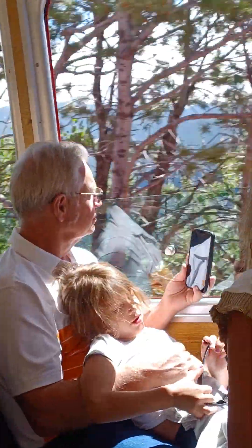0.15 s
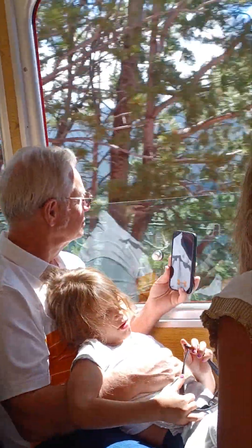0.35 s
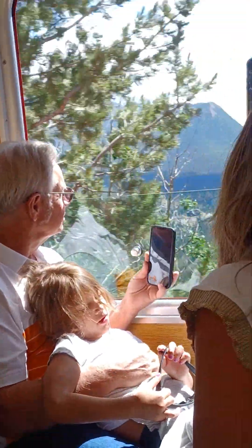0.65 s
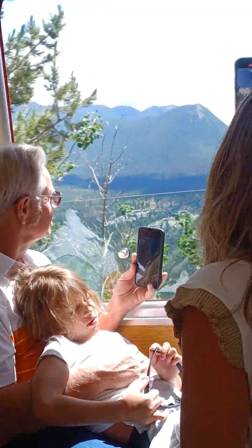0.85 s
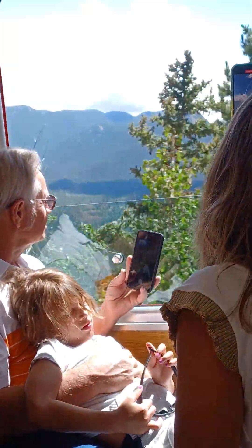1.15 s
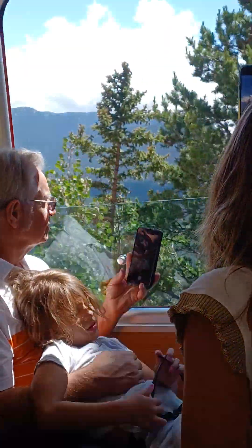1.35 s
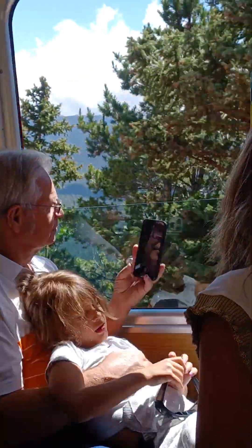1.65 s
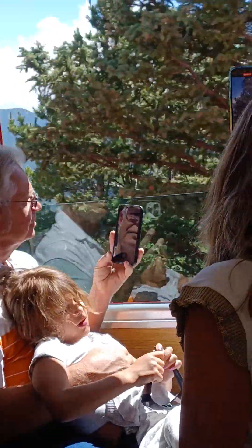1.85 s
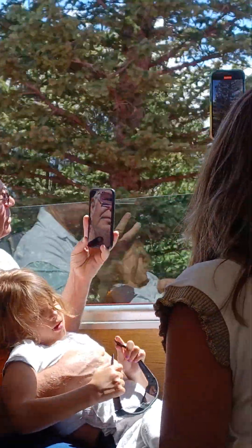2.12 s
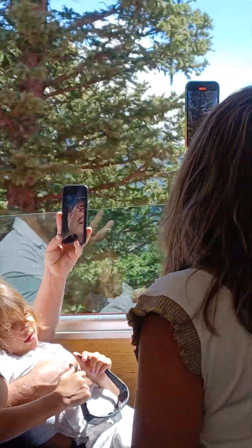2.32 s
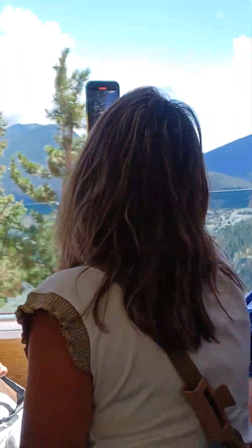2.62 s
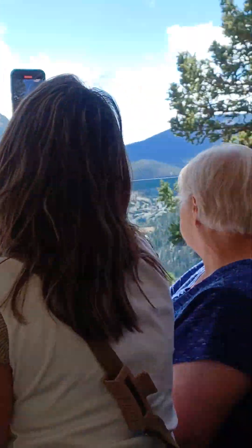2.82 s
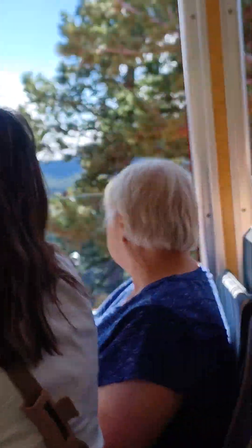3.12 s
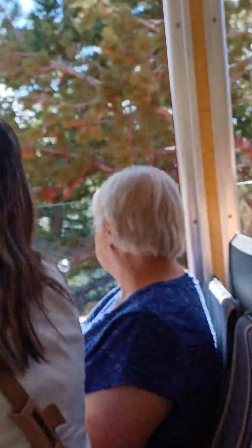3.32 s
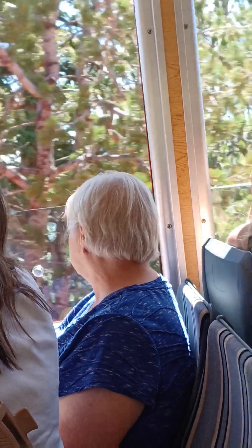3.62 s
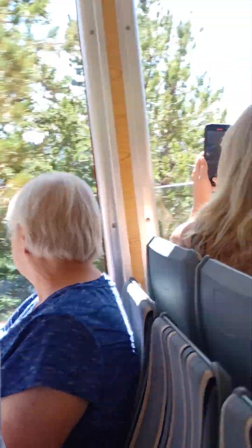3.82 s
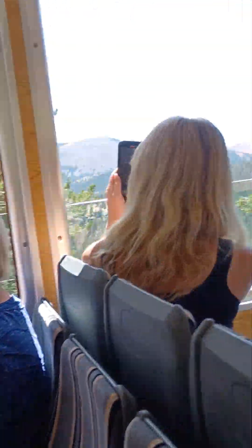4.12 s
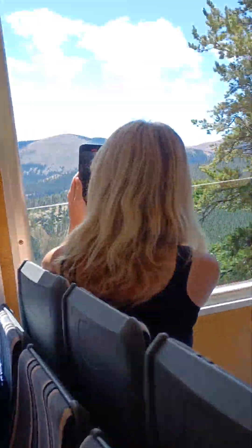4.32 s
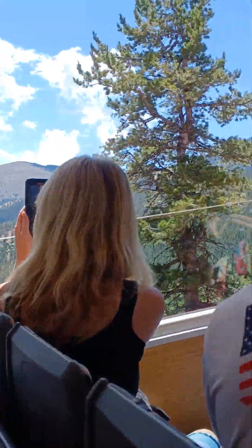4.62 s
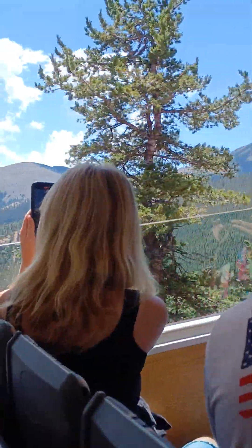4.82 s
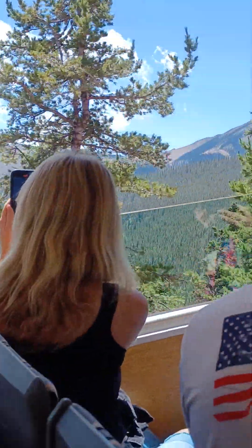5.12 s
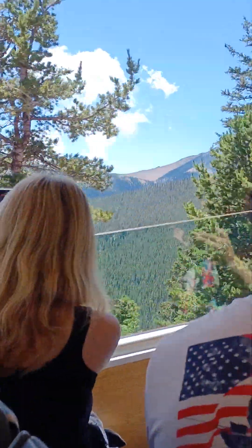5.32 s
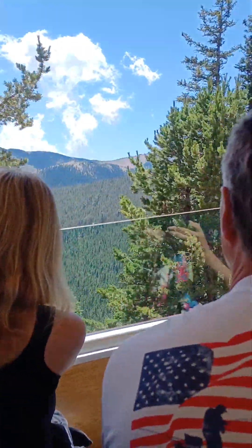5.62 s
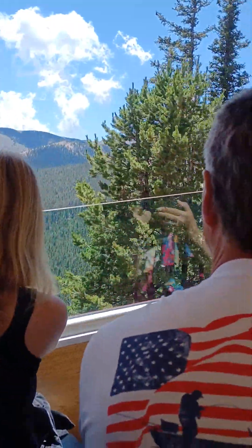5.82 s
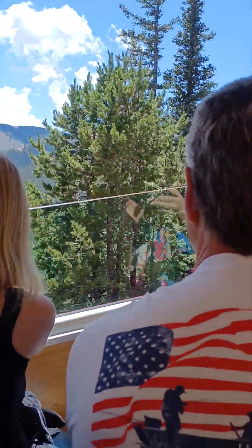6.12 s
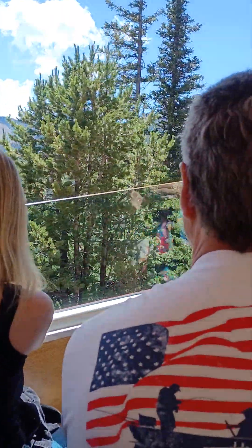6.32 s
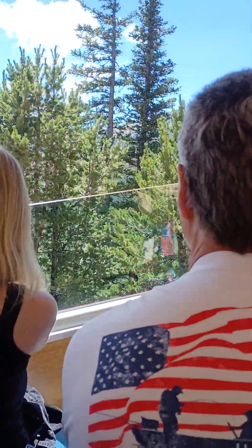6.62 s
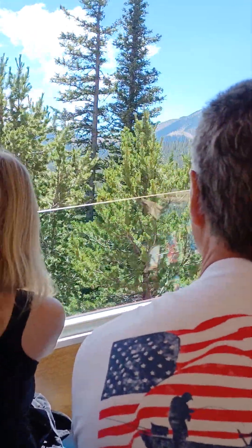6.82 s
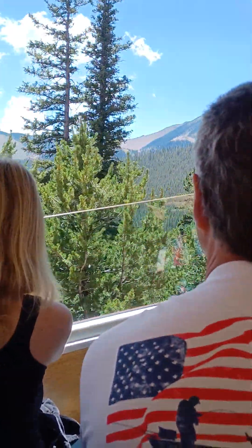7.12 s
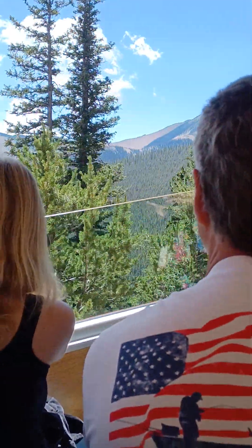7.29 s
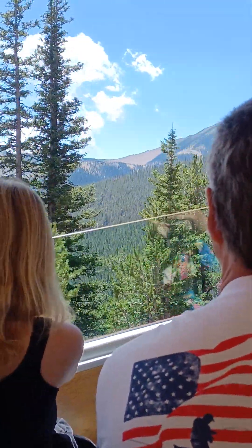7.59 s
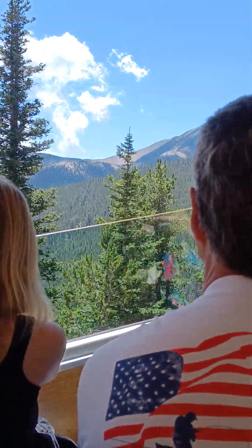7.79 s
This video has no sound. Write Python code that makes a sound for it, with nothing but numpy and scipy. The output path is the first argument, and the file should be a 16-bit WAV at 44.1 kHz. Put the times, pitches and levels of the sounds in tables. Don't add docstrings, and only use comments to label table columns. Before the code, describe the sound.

A continuous diesel drone fills a passenger cabin with open windows, beginning and ending mid-ride. Rough low rumble and layered gear hum support it; the mid hum grows clearer around the middle while the microphone swings. A thin, high whistle glints from side to side, and quiet rushing air brightens briefly as trees pass. A few faint ticks of loose fittings interrupt the otherwise steady, close stereo sound.

```python
import sys
import numpy as np
from scipy import signal
from scipy.fft import rfft, irfft, next_fast_len
from scipy.io import wavfile
from scipy.ndimage import uniform_filter1d, map_coordinates

SR = 44100
rng = np.random.default_rng(int(sys.argv[2]) if len(sys.argv) > 2 else 0)


def amplitude_ratio(level_db):
    exponent = np.asarray(level_db, float) / 20
    return 10 ** exponent


def file_out(sig):
    cols = np.atleast_2d(sig).T
    lim = np.clip(cols, -1, 1)
    pcm = np.round(lim * 32767).astype(np.int16)
    wavfile.write(sys.argv[1], SR, pcm)


N = 350595
SHAFT_HZ = 17.793

# order, level/dB, gain over the turn/dB, gain per boom [dB/dB], gain when facing/dB
STRONG_ORDERS = [(5, -24, -6, -0.23, 1.7), (6, -22, -0.1, 1.03, -1.1), (7, -27, -3.5, 1.77, -3),
                 (9, -33, 11.5, -0.14, 1.5), (12, -39, -1, 0.7, 2), (13, -24.5, -4, 0.04, 1),
                 (14, -33.5, 5, -0.34, 2), (16, -33, -2.5, -0.3, 0)]
# order, level/dB
WEAK_ORDERS = [(3, -45.5), (4, -40.5), (8, -37), (10, -69), (11, -41), (17, -40), (18, -44), (19, -49.5),
               (24, -54.5), (25, -81), (26, -50), (37, -54), (38, -52), (54, -55.5), (55, -61), (96, -63.5),
               (105, -66), (106, -63), (117, -59.5)]
# t/s, level/dB
STANDING_WAVE = [(0, -21), (1.4, -22), (2.0, -27.5), (2.4, -31), (2.8, -23), (3.2, -25.5), (3.9, -19.5),
                 (5.5, -20), (6.0, -23.5), (6.8, -30), (7.4, -27), (7.95, -21.5)]
# t/s, share of the turn [0-1]
TURN = [(0, 0.02), (1.4, 0.05), (2.6, 0.38), (4.8, 0.64), (6.3, 0.94), (7.95, 0.87)]
# t/s of rise starting, full, fall starting, gone
FACING_TIMES = (1.9, 2.9, 4.95, 5.15)
# f/Hz, level/dB
DRIVE_LINE = [(45.66, -45), (73.1, -41), (91.6, -36.5), (146.2, -41.5), (233.1, -40.5), (246.4, -38.5),
              (281.3, -44), (749.1, -51.5), (2110, -66)]
# f/Hz, level/dB, gain over the turn/dB, gain when facing/dB
GEARBOX_WHINE = [(748, -44, -5.5, 2.5), (846, -54, 3, -7), (1021, -49, 1, -0.5), (2008.5, -58.5, -14, 9)]
# t/s, f/Hz
WHISTLE_PITCH = [(0, 4432), (.8, 4439), (1.25, 4428), (1.7, 4448), (2.6, 4434), (3.3, 4450), (3.9, 4434),
                 (6.2, 4445), (7.0, 4432), (7.95, 4436)]
# t/s, length/s, left level/dB, right level/dB
GLINTS = [(.22, 0.71, -65, -51), (1.2, 0.26, -42.5, -67), (2.19, 0.56, -42.5, -63), (2.35, 0.15, -53, -45),
          (2.88, 0.14, -44, -45), (3.26, 0.29, -49, -51), (3.913, 0.22, -44.5, -44.5),
          (4.23, 0.33, -44, -45), (4.9, 0.31, -49, -60), (5.676, 0.14, -43.5, -41.5),
          (6.27, 0.31, -44, -54), (6.715, 0.42, -44.5, -45), (7.38, 0.1, -44.5, -53),
          (7.62, 0.26, -59, -41.5), (7.92, 0.19, -61, -44.5)]
# t/s, level/dB
THIRD_HARMONIC = [(0, -57), (1.0, -59), (1.5, -60), (2.6, -64), (3.4, -70), (3.8, -63), (4.35, -64),
                  (4.8, -69), (5.25, -62), (6.0, -65), (6.5, -59), (7.2, -56.5), (7.95, -57.5)]
# f/Hz, level/dB per Hz
RUMBLE_SPECTRUM = [(15, -60), (36, -45), (44, -1), (60, -18), (74, -11.5), (102, -7.5), (141, -5.5),
                   (181, -6.5), (239, -2.5), (321, -7), (424, -14), (592, -18.5), (900, -41), (1540, -120)]
# f/Hz, level/dB per Hz
ROAR_SPECTRUM = [(260, -55), (450, -15.5), (548, -8), (601, -17), (796, -13), (996, -14.5), (1150, -19),
                 (1280, -18), (1450, -21.5), (1790, -24), (2050, -23.5), (3200, -33), (4200, -39),
                 (9240, -120)]
# f/Hz, level/dB per Hz
RUSH_SPECTRUM = [(2100, -4.5), (3500, -8), (4200, -4), (5300, -6.5), (6600, -11), (7700, -19.5),
                 (8600, -19), (11000, -52), (19000, -120)]
# f/Hz, level/dB per Hz
HISS_SPECTRUM = [(4410, -18), (7500, -13.5), (8370, -16), (8600, -10), (9630, -6.5), (12000, 5),
                 (13700, -2.5), (14000, -3), (15000, -8), (15600, -16)]
# t/s, level/dB
DRAUGHT = [(0, -56), (.6, -56), (1.5, -55.2), (2.1, -55), (2.9, -54.6), (3.5, -56), (4.3, -55.5),
           (4.8, -55.6), (5.6, -56.2), (6.3, -55.5), (7.0, -53.5), (7.95, -52.5)]
# t/s, length/s, level/dB
GUSTS = [
    (3.14, 0.21, 2.5),
    (4.33, .15, 1),
    (5.97, .1, 1),
    (7.57, 0.14, 2),
]
# t/s, delay/s
PANE_DELAY = [(0, .0034), (1.6, .0034), (3.2, .00325), (5, .0033), (7.95, .00335)]
# t/s, peak level/dB, t60/s, centre f/Hz, extra level in the port resonance/dB
TICKS = [
    (0.1494, -36, .004, 9500, 8),
    (0.152, -31, .008, 15000, 3.5),
    (.9795, -33, .018, 5000, 0),
    (.9918, -30, .008, 5200, 1),
    (.9952, -47, .008, 9000, 19),
    (4.2794, -42, 0.022, 6500, 0),
    (4.471, -36, .07, 3100, -20),
    (4.485, -34, .05, 3000, -20),
    (6.8967, -46, .01, 9000, 4),
]
# f/Hz, coherence [0-1]
LIKENESS = [(40, 0.96), (120, 0.97), (250, 0.93), (450, 0.85), (800, 0.3), (1300, 0.24), (2500, 0.054),
            (6500, .05), (9000, 0.22), (11500, 0.13), (15000, 0.18)]
# f/Hz, left-right level/dB
PORT_LEAN = [(60, 4), (110, -0.5), (200, 0), (380, 0), (700, -1), (1290, -1.0), (2380, 0.5), (4400, 1),
             (8120, 2), (15000, -4.5)]


def engine(shaft, turn, facing):
    boom_db, = curves(STANDING_WAVE)
    boom_db = boom_db - boom_db.mean()
    out = np.zeros((2, N))
    for k, db, turn_db, share, face_db in STRONG_ORDERS:
        level_db = db + turn_db * turn + share * boom_db + face_db * facing
        out += tone(k * shaft + k * k, k * SHAFT_HZ, level_db, unsteady=0.00069 * k * k, rate=3.015)
    for k, db in WEAK_ORDERS:
        out += tone(k * shaft + k * k, k * SHAFT_HZ, db, unsteady=0.65, rate=3.14)
    return out


def gears(turn, facing):
    low_db = -35.5 + 5.5 * facing - 2.3 * turn
    low = tone(turning(322.5), 322.5, low_db, unsteady=0.15, rate=4)
    out = low + high_mesh(turn, facing) + loose_panel(turn)
    for hz, db in DRIVE_LINE:
        out += tone(turning(hz), hz, db, unsteady=0.44, rate=3.042)
    for hz, db, turn_db, face_db in GEARBOX_WHINE:
        out += tone(turning(hz), hz, db + turn_db * turn + face_db * facing, unsteady=0.43, rate=5.5)
    return out


def high_mesh(turn, facing):
    phase = turning(511.3) + 0.4 * wobble(2.5)
    mid_db = -37.5 + 8.5 * facing - 2.3 * turn
    side_db = -38.5 + 8 * turn - 3.5 * facing
    waver_db = 0.35 * np.abs(mid_db + 29) * wobble(7)
    mid = amplitude_ratio(mid_db + waver_db) * np.sin(phase)
    side = amplitude_ratio(side_db + 0.94 * wobble(7.7)) * np.sin(phase + 1.0)
    return np.sqrt(2) * np.array([mid + side, mid - side])


def loose_panel(turn):
    return tone(turning(648 + 6 * wobble(4)), 648, -46 - 7.5 * turn, unsteady=1.0, rate=11)


def turbo(shaft):
    low_hz, high_hz = 4421, 4437
    (hz,), (third_db,) = curves(WHISTLE_PITCH), curves(THIRD_HARMONIC)
    upper = np.clip((hz - low_hz) / 30, 0.35, 0.7)
    load_hz = 0.5 * (hz - high_hz)
    phases = []
    for blade_hz in (low_hz, high_hz):
        pitch = blade_hz + load_hz + 5 * wobble(7) + 6.5 * wobble(40)
        phases.append(turning(pitch) + 0.48 * np.sin(3 * shaft))

    def pair(k):
        return np.sqrt(1 - upper) * np.sin(k * phases[0]) + np.sqrt(upper) * np.sin(k * phases[1])

    flutter_db = 2.6 * np.cos(3 * shaft) + 2.5 * wobble(45) + 1.8 * np.array([wobble(20), wobble(20)])
    first = amplitude_ratio(glints() + flutter_db) * cabin(pair(1), t60=0.18, wet=1.7)
    second = amplitude_ratio(-66 + 2.4 * wobble(9)) * cabin(pair(2), t60=0.25, wet=0.49)
    third_db = third_db + 2.5 + 1.6 * wobble(9) + 1.5 * wobble(20)
    third = amplitude_ratio(third_db) * cabin(pair(3), t60=0.2, wet=0.38)
    return first + second + third


def glints():
    floor_db = np.array([-51.5, -52])
    power = amplitude_ratio(2 * floor_db)[:, None] * amplitude_ratio(4 * np.array([wobble(16), wobble(16)]))
    for s, length, *ports_db in GLINTS:
        power = power + amplitude_ratio(2 * np.array(ports_db))[:, None] * swell(s, length)
    return 10 * np.log10(power)


def cabin(x, t60, wet):
    t = np.arange(SR // 2) / SR
    heard = x * np.ones((2, 1))
    for _ in range(3):
        tail = amplitude_ratio(-60 * t / t60) * rng.standard_normal((2, len(t)))
        echo = signal.fftconvolve(x[None], tail / np.linalg.norm(tail[0]), axes=1)[:, :N]
        heard = heard + wet * wobble(3.08) * echo
    power = uniform_filter1d(uniform_filter1d(heard ** 2, size=3500), size=3500)
    return heard / np.sqrt(np.abs(power) + 1e-9)


def body_and_air(shaft, turn, facing):
    air_db, = curves(DRAUGHT)
    swing_db = air_db - air_db.mean()
    firing, gust = np.cos(3 * shaft), wobble(15)
    puff_db = sum(db * swell(s, length) for s, length, db in GUSTS)
    structure = rumble(facing, swing_db) + roar(turn, facing, firing, puff_db)
    return structure + rushing_air(swing_db, firing, gust, puff_db) + hiss(air_db, firing, gust, puff_db)


def rumble(facing, swing_db):
    level_db = -24 + 0.45 * facing + 0.7 * swing_db + 0.61 * wobble(2.81)
    return amplitude_ratio(level_db) * rush(RUMBLE_SPECTRUM, patchy_db=0.23, lead=0.00031)


def roar(turn, facing, firing, puff_db):
    level_db = -34 - 1.35 * turn + 0.46 * puff_db + facing + 0.2 * firing
    return amplitude_ratio(level_db) * rush(ROAR_SPECTRUM, patchy_db=0.7, lead=0.00013)


def rushing_air(swing_db, firing, gust, puff_db):
    level_db = -45.5 + 0.24 * swing_db + puff_db + 0.64 * firing + 0.41 * gust
    return amplitude_ratio(level_db) * rush(RUSH_SPECTRUM, patchy_db=0.3, lead=4e-5)


def hiss(air_db, firing, gust, puff_db):
    level_db = 5.5 + air_db + 0.8 * puff_db + 0.8 * firing + 0.4 * gust + 0.6 * wobble(30)
    return amplitude_ratio(level_db) * pane(rush(HISS_SPECTRUM, patchy_db=0.3, lead=4e-5))


def pane(x):
    delay, = curves(PANE_DELAY)
    late = np.arange(N) - SR * (delay + 4e-6 * wobble(1.5))
    return x + 0.3 * np.array([map_coordinates(port, [late], mode="mirror") for port in x])


def ticks():
    port_hz = 12600
    out, t = np.zeros((2, N + SR)), np.arange(SR // 20) / SR
    for s, db, t60, hz, port_db in TICKS:
        crack = rng.standard_normal(len(t)) + 0.66 * rng.standard_normal((2, len(t)))
        crack = ring(crack, hz) + amplitude_ratio(port_db) * ring(crack, port_hz)
        crack = crack * amplitude_ratio(-60 * t / max(t60, 1e-3))
        out[:, round(s * SR):][:, :len(t)] += amplitude_ratio(db - 5.0) * crack
    return out[:, :N]


def ring(x, hz):
    band = [0.8 * hz, min(1.25 * hz, 0.49 * SR)]
    return unit(signal.sosfilt(signal.butter(2, band, "bandpass", fs=SR, output="sos"), x))


def tone(phase, hz, db, unsteady, rate):
    shared = 1 + unsteady * (wobble(rate) + 1j * wobble(rate))
    unlike = np.sqrt((1 - np.clip(along(LIKENESS, hz), 0, 1)) / 2)
    across = unlike * (wobble(rate / 2) + 1j * wobble(rate / 2))
    wave = np.sqrt(2) * amplitude_ratio(db) * np.exp(1j * phase)
    return np.real(wave * shared * [1 + across, 1 - across])


def rush(spectrum, patchy_db, lead):
    z = signal.stft(rng.standard_normal((2, N)), nperseg=512)[2]
    field = uniform_filter1d(rng.standard_normal(z.shape[1:]), size=8, axis=0)
    field = uniform_filter1d(field, size=10, axis=1)
    pair = signal.istft(z * amplitude_ratio(patchy_db * unit(field)), nperseg=512)[1][:, :N]

    def mid_side(hz):
        angle = np.arccos(np.clip(along(LIKENESS, hz), -1, 1)) / 2
        return amplitude_ratio(along(spectrum, hz)) * [np.cos(angle), np.sin(angle)]

    mid, side = filtered(pair, mid_side)
    ports = [mid + side, mid - side]
    return unit(filtered(ports, lambda hz: np.exp(1j * np.pi * lead * np.outer([1, -1], hz))))


def turning(hz):
    return 2 * np.pi * (np.cumsum(hz + np.zeros(N)) / SR + rng.random())


def wobble(rate):
    knots = rng.standard_normal(1000)
    return np.interp(np.arange(N) * rate / SR, np.arange(len(knots)), knots)


def swell(s, length):
    return np.exp(-(2 * (np.arange(N) / SR - s) / length) ** 4)


def filtered(x, response):
    edge = SR // 8
    x = np.pad(x, [(0, 0), (edge, edge)], "reflect")
    m = next_fast_len(x.shape[1])
    return irfft(rfft(x, m) * response(np.fft.rfftfreq(m, 1 / SR)), m)[:, edge:edge + N]


def unit(x):
    return x / np.sqrt(np.mean(np.abs(x) ** 2) + 1e-20)


def along(points, hz):
    f, v = np.transpose(points)
    return np.interp(np.log(hz + 1), np.log(f + 1), v)


def curves(rows):
    s, *cols = np.transpose(rows)
    return [np.interp(np.arange(N) / SR, s, c) for c in cols]


def scene():
    shaft = turning(SHAFT_HZ + 0.01972 * wobble(1.518))
    turn, = curves(TURN)
    facing, = curves(list(zip(FACING_TIMES, (0, 1, 1, 0))))
    machinery = engine(shaft, turn, facing) + gears(turn, facing) + turbo(shaft)
    return machinery + body_and_air(shaft, turn, facing) + ticks()


def low_pass(x):
    return signal.sosfilt(signal.butter(12, 15710, fs=SR, output="sos"), x)


def record(dry):
    ports = filtered(dry, lambda hz: amplitude_ratio(np.outer([0.5, -0.5], along(PORT_LEAN, hz))))
    closing = np.sin(np.pi / 2 * np.clip(np.arange(N)[::-1] / (0.004 * SR), 0, 1)) ** 2
    return low_pass(ports * closing)


dry = scene()
out = record(dry)
file_out(out)
```